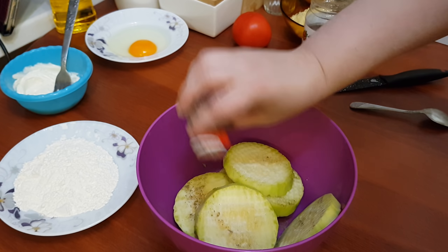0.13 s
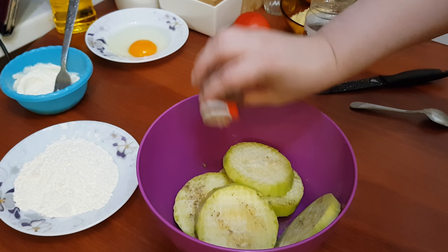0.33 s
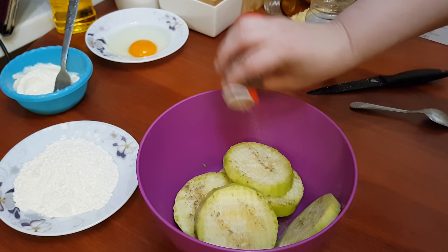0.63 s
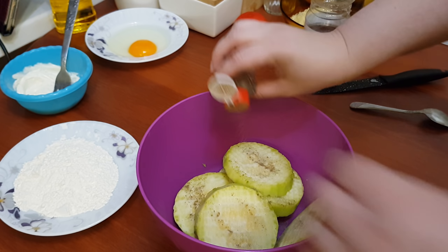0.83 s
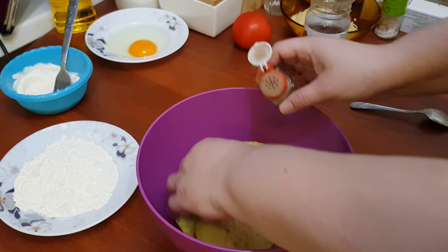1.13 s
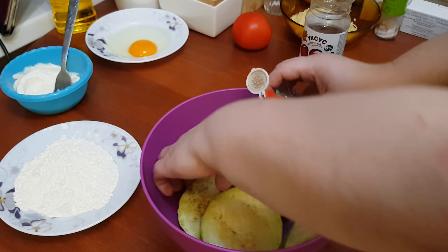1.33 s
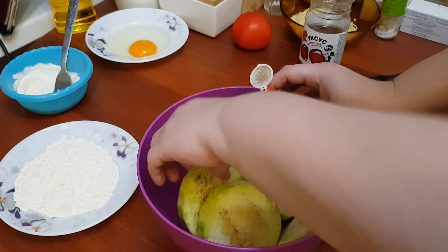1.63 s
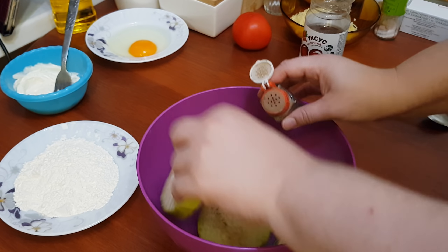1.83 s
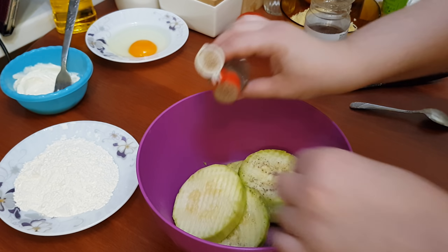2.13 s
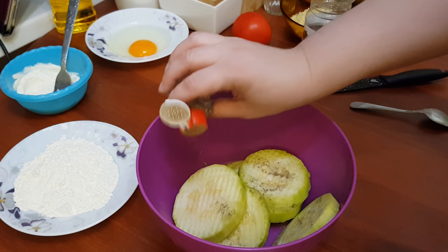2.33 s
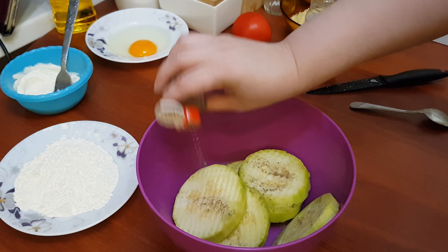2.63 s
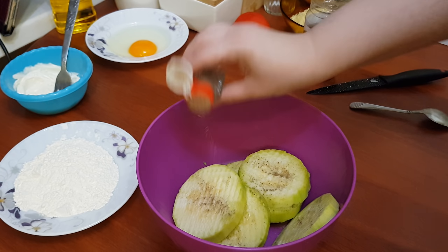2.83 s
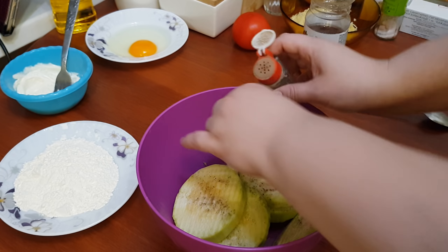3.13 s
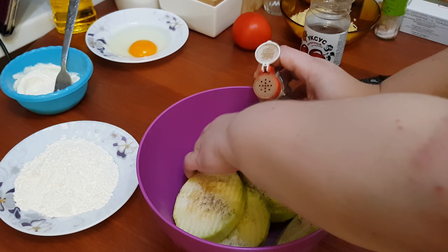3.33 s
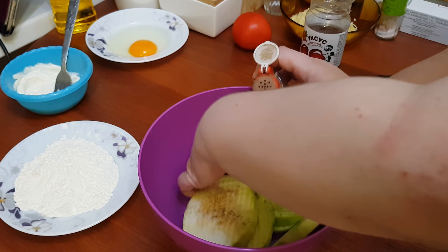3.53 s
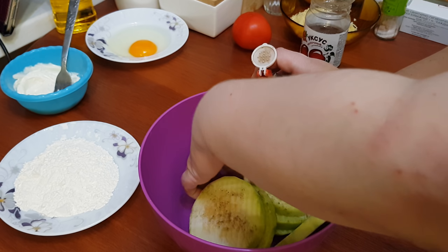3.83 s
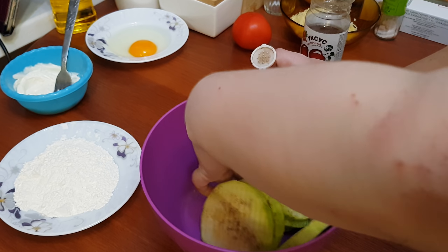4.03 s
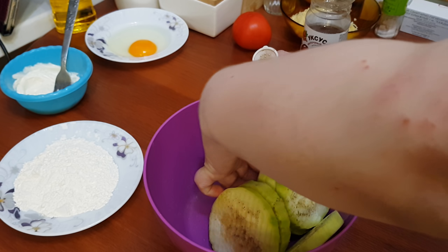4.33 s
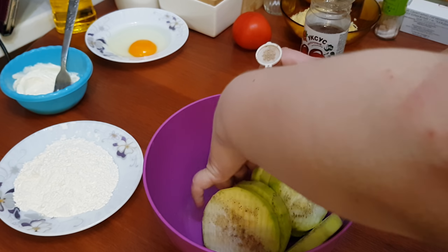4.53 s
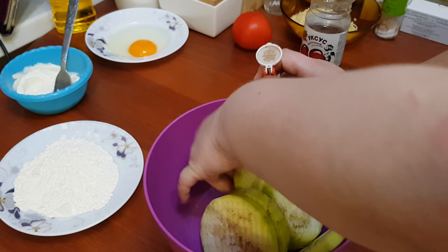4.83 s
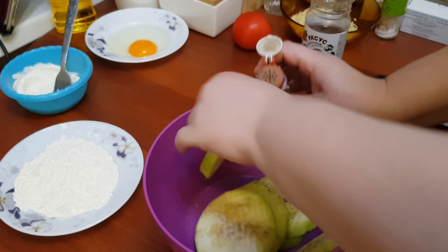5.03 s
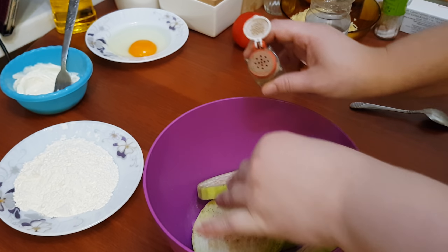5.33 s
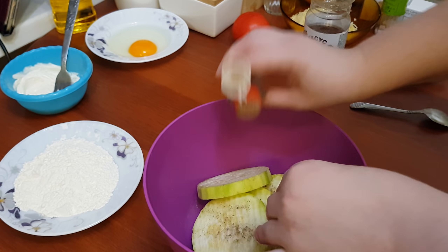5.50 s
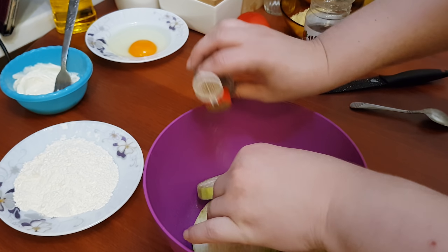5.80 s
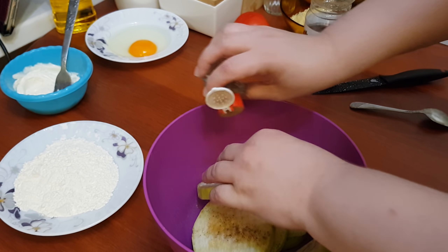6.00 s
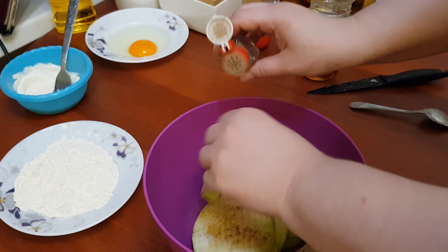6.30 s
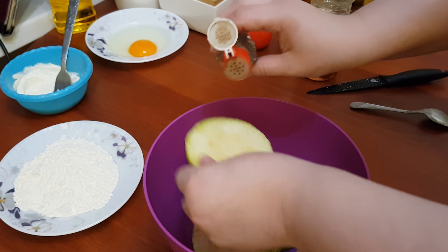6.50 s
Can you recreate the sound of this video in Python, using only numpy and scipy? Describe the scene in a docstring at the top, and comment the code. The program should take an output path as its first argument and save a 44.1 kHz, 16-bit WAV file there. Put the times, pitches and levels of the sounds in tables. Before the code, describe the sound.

Squash slices knock, slide and squeak in a plastic bowl with light irregular thuds and a soft rustle of seasoning.

```python
"""Squash slices turned over in a plastic bowl on a wooden table, close to a stereo microphone.
Slices and fingers knock and slide on the wall and set bowl and table ringing; wet faces squeak
and slap apart, skin and seasoning rustle. Across the small kitchen a wall clock ticks, heard only
through the room. A faint breathy tone comes and goes; the building hums under the microphone hiss."""
import sys
import numpy as np
from scipy import signal
from scipy.fft import rfft, irfft
from scipy.io import wavfile

SR = 44100
rng = np.random.default_rng(int(sys.argv[2]) if len(sys.argv) > 2 else 0)


def transcribe(signal):
    """Save signal, clipped to [-1, 1], as a 16-bit WAV file at the path in sys.argv[1]."""
    frames = np.atleast_2d(signal).T
    limited = np.clip(frames, -1, 1)
    pcm = np.round(limited * 32767).astype(np.int16)
    wavfile.write(sys.argv[1], SR, pcm)


N = 293706

# Knocks on the bowl. Each row: start in seconds, wall level in dB, then table boom, thud, hard edge
# and crack in dB on top of it (knocks() adds an offset to each), left minus right in dB.
KNOCKS = [(0.145, -51.5, -5.5, 2, -29, -26.5, -0.5), (0.498, -35.5, -26, -22, -42, -29.5, -2),
          (0.569, -40.5, -9, -5.5, -34, -46, 1), (0.595, -40.5, -21, -27, -37, -40, -4),
          (0.668, -49, -12, -1.5, -31, -46, 2), (1.126, -16.5, -37, -19.5, -0.5, -19.5, 2.5),
          (1.138, -17.5, -34, -21, -35, -12.5, 1), (1.224, -27, -38, -18, -5.5, -19.5, -1.5),
          (1.271, -28, -37, -23, -1, -14, 2.5), (1.37, -28, -36, -19, -14, -23, 1),
          (1.462, -25, -33.5, -19.5, -17.5, -22.5, -1.5), (1.499, -37.5, -10.5, -28, -19, -6.5, 2),
          (1.671, -27.5, -39, -27, -10.5, -26, 3), (1.691, -29, -36, -19.5, -9, -39, 2),
          (1.71, -31, -38, -12.5, -11.5, -23, 6), (1.823, -17, -24, -20, -29, -28.5, 2),
          (1.963, -31, -26, -18, -38, -49, -3), (1.997, -27, -21, -20, -13, -18.5, 1.5),
          (2.487, -52.5, -12, -1.5, -29, -27, -3), (2.604, -39, -23.5, -14, -31, -41, -1),
          (2.948, -44, -25, -11, -17.5, -32, -3), (3.172, -16.5, -65, -22.5, -1, -6, 3.5),
          (3.191, -18, -32, -27, -21, -21, 0.5), (3.289, -23, -37, -22, -10, -41, 2),
          (3.37, -32, -29, -12, -27, -24, 3), (3.529, -38, -13, -8.5, -23, -11.5, -3),
          (4.228, -40, -43, -29, -24, -17, 2.5), (4.602, -44, -12.5, -22.5, -13.5, -23, 2),
          (4.632, -39.5, -16.5, -12, -21.5, -31, 1), (5.055, -30.5, -11.5, -49, -2, -24.5, -2),
          (5.059, -12, -25, -29.5, -23, -17, 0.5), (5.25, -39.5, -7, -5.5, -34, -23, -0.5),
          (5.604, -49, -13, -10, -38, -34.5, -2), (6.185, -57.5, -5, -24, -22, -1.5, -4.5)]
# Modes of bowl and table. Each row: pitch in Hz, relative level in dB, 60 dB decay time in seconds.
BOWL_MODES = [(50, -7, .1), (91, -3, .07), (127, 7.5, 0.27), (193.6, 1.5, .1), (268.9, -2.5, 0.27),
              (329.5, -2, 0.18), (450, -10, 0.088), (543, 2.5, 0.052), (700, 10, 0.0078),
              (707.6, -4.5, 0.16), (731.5, 0, 0.01), (1003, 7.5, 0.022), (1234, 2, 0.021),
              (1308, 10.5, 0.0077), (1400, 6.5, .003), (1893, 4.5, 0.011), (2214, -4.5, 0.049),
              (2684, 3.5, .003), (3347, -2.5, 0.0032), (4238, -3.5, 0.003), (7041, -6, .0012),
              (11400, -14.5, 0.0015)]
# Strokes of slices and fingers. Each row: middle in seconds, half length in seconds,
# relative slide level in dB, rustle level in dB, squeak pitch in Hz.
STROKES = [(0.143, 0.12, -95, -77.5, 587), (0.52, 0.13, -68, -86, 600), (0.975, 0.1, -75, -59, 1230),
           (1.26, .12, -46, -71.5, 1250), (1.419, 0.057, -47.5, -71, 1270), (1.509, 0.019, -70, -55, 2220),
           (1.603, 0.058, -49.5, -69, 1250), (1.714, 0.032, -49, -63, 2300),
           (1.999, 0.063, -57, -60.5, 1400), (2.264, 0.11, -81, -65.5, 1230),
           (2.508, 0.21, -71.5, -73, 600), (3.091, .12, -70.5, -60, 1270), (3.377, 0.027, -45.5, -79, 1230),
           (3.511, .1, -48.5, -59.5, 2287), (3.77, 0.11, -66.5, -75.5, 1250),
           (3.984, 0.064, -58, -65.5, 1470), (4.173, 0.09, -49, -66.5, 1087),
           (4.39, 0.035, -54.5, -69, 2200), (4.631, 0.018, -54, -90.5, 2810),
           (4.766, 0.05, -45.5, -65.5, 2220), (5, 0.12, -64, -79, 2270), (5.153, 0.077, -54, -63.5, 1490),
           (5.257, 0.012, -49.5, -54, 2830), (5.746, 0.056, -92, -75.5, 1280),
           (6.09, 0.053, -82.5, -76.5, 1240), (6.193, 0.016, -92.5, -61, 2525),
           (6.244, 0.03, -62.5, -67.5, 810), (6.285, 0.015, -81, -67.5, 3000)]
# Slips along the bowl wall. Each row: frequency in Hz, relative spectral density in dB.
SLIDE_SPECTRUM = [(88, -2), (150, -13), (275, -6.5), (485, -4.5), (551, -6), (841, -5.5), (1090, -8),
                  (2180, -11.5), (4540, -22.5), (12000, -87), (15600, -93), (22000, -120)]
# Dry skin and seasoning. Each row: frequency in Hz, relative spectral density in dB.
RUSTLE_SPECTRUM = [(880, -44.5), (1500, -43), (2110, -7), (3440, -12), (4660, -7.5), (7820, -10.5),
                   (11900, -11), (15500, -17)]
# Modes of the clock case. Each row: pitch in Hz, relative level in dB, 60 dB decay time in seconds.
CLOCK_MODES = [(2730, -1.5, 0.003), (3800, 0, 0.0014)]
# The kitchen's reverberation. Each row: frequency in Hz, 60 dB decay time in seconds.
ROOM_T60 = [(100, 0.26), (700, 0.31), (2000, 0.32), (6000, 0.34), (15000, 0.057)]
# Diffuse sound at the microphone. Each row: frequency in Hz, correlation of left and right.
STEREO_LIKENESS = [(60, 0.64), (290, 0.89), (640, .25), (1400, -0.32), (15000, 0)]
# Rise and fall of the breathy tone. Each row: time in seconds, level in dB.
WHISTLE_LEVELS = [(0, -99), (.3, -81), (.7, -88), (2.0, -92.5), (2.9, -78), (3.101, -94.5), (6.66, -97)]
# Building hum and microphone hiss. Each row: frequency in Hz, relative spectral density in dB.
FLOOR_SPECTRUM = [(12, -43), (20, -23), (53, 0), (202, -4), (308, -12), (407, -13.5), (772, -20.5),
                  (993, -15), (1550, -25), (2110, -26.5), (2710, -44), (3580, -22.5), (6080, -36),
                  (12900, -28.5), (15700, -37)]
# Borders in Hz between the mode families: table boom, thud, wall, hard edge, crack.
FAMILY_BORDERS_HZ = [160, 400, 850, 2400]

TRAVEL_S = 0.001684   # from bowl to microphone
SOFT_BELOW_DB, SPREAD_MS_PER_DB = -28, 1.62   # light touches land gradually: the weaker, the longer
LATER_SLIPS_DB = -5.5
SPRAY_DB, SPRAY_T60_S, SPRAY_ABOVE_HZ = -27.5, 0.15, 6000
SQUEAK_DB, SQUEAK_T60_S = -8, .006
CLOCK_START_S, CLOCK_STEP_S, CLOCK_DRIVE_DB = .358, .08, -54
ROOM_SEND_DB, FIRST_ECHO_S = -2, 0.0018
WHISTLE_HZ, WHISTLE_WIDTH_HZ = 2110, 200
FLOOR_DB, CUTOFF_HZ = -62.5, 16200


def knocks():
    """A contact is a main slip and two weaker ones; each strikes every mode with a smooth push."""
    start_s, wall_db, boom_db, thud_db, edge_db, crack_db, balance_db = np.transpose(KNOCKS)
    is_later = np.array([0, 1, 1])
    spread_s = np.maximum(SOFT_BELOW_DB - wall_db, .3) * SPREAD_MS_PER_DB / 1000
    late_s = spread_s[:, None] * rng.random((len(KNOCKS), 3)) * is_later
    landings = np.round((start_s[:, None] + TRAVEL_S + late_s) * SR).astype(int)
    side_gains = from_db(np.outer([.5, -.5], balance_db))
    family_db = [boom_db + 6, thud_db + 6, 0, edge_db + 6, crack_db + 16]
    scatter_db = rng.normal(0, 1.5, (len(KNOCKS), 3, len(BOWL_MODES)))
    bowl = np.zeros((2, N))
    for k, (hz, mode_db, t60) in enumerate(BOWL_MODES):
        push = np.hanning(int(.6 * SR / hz) + 3)   # about half a cycle
        span = landings[..., None] + np.arange(len(push)) - min(len(push) // 2, 40)
        size_db = wall_db - 9 + family_db[np.searchsorted(FAMILY_BORDERS_HZ, hz)] + mode_db
        sizes = from_db(size_db[:, None] + LATER_SLIPS_DB * is_later + scatter_db[:, :, k])
        force = np.zeros((2, N))
        for side, gain in zip(force, side_gains):
            np.add.at(side, span, (gain[:, None] * sizes)[..., None] * push / push.sum())
        polarity = (-1) ** k if t60 > .01 else 1   # brief modes push together
        bowl += polarity * ring(force, hz, t60)
    return bowl


def spray():
    """Wet faces slap apart with a bright spit: high noise leaps up at each knock and dies fast."""
    start_s, wall_db, _, _, _, crack_db, _ = np.transpose(KNOCKS)
    hits = np.zeros(N)
    hits[np.round((start_s + TRAVEL_S) * SR).astype(int)] = from_db(wall_db + crack_db / 2 + SPRAY_DB)
    fade = signal.lfilter([1], [1, -from_db(-60 / (SPRAY_T60_S * SR))], hits + 1e-18)
    highpass = signal.butter(2, SPRAY_ABOVE_HZ, "high", fs=SR, output="sos")
    return fade * signal.sosfilt(highpass, rng.standard_normal((2, N)))


def rubbing():
    """Sliding slips drive the bowl modes and a wet squeak, dead centre; a finer rustle spreads wide."""
    slips = colour(grains(per_s=2500, spread_db=3.4), SLIDE_SPECTRUM)
    bowl = rms_one(sum(from_db(db) * ring(slips, hz, t60) for hz, db, t60 in BOWL_MODES))
    scuff = rms_one(slips + .5 * bowl)
    wet_slips = rms_one(grains(per_s=2200, spread_db=2.3))
    slide, rustle_gain = np.zeros(N), np.zeros(N)
    for middle_s, half_s, slide_db, rustle_db, squeak_hz in STROKES:
        first, last = int((middle_s - 3 * half_s) * SR), int((middle_s + 3 * half_s) * SR)
        span = np.arange(max(first, 0), min(last, N))
        speed = np.exp(-((span / SR - middle_s) / half_s) ** 2)
        squeak = from_db(SQUEAK_DB) * rms_one(ring(wet_slips[span], squeak_hz, SQUEAK_T60_S))
        slide[span] += from_db(slide_db) * speed * (scuff[span] + squeak)
        rustle_gain[span] += from_db(rustle_db) * speed
    rustle = np.array([colour(grains(per_s=9000, spread_db=3.2), RUSTLE_SPECTRUM) for side in range(2)])
    slide *= from_db(0.92 * drift(25) - 5)   # both levels flutter
    rustle_gain *= from_db(1.66 * drift(28.5))
    return slide + rustle_gain * rustle


def clock():
    """Once a second the hand steps on, and a short run of small clicks rings the case."""
    starts_s = np.arange(CLOCK_START_S, N / SR, 1)
    clicks_s = starts_s[:, None] + CLOCK_STEP_S * rng.random((len(starts_s), 14))
    clicks = np.zeros(N)
    clicks[(clicks_s * SR).astype(int)] = from_db(CLOCK_DRIVE_DB) * rng.standard_normal(clicks_s.shape)
    case = sum(from_db(db) * ring(clicks, hz, t60) for hz, db, t60 in CLOCK_MODES)
    return signal.sosfilt(signal.butter(2, 5000, fs=SR, output="sos"), case)


def kitchen(sound):
    """Dense echoes off the near walls reach the microphone after a short gap and die band by band."""
    t = np.arange(SR // 2) / SR
    echoes = diffuse(len(t), lambda hz: from_db(-60 * t / at_hz(ROOM_T60, hz)))
    echoes *= np.clip(t / FIRST_ECHO_S - .5, 0, 1)
    echoes /= np.sqrt(np.mean(np.sum(echoes ** 2, axis=1)))   # unit energy
    return signal.fftconvolve(sound[None], echoes, axes=1)[:, :N]


def whistle():
    """A faint breathy tone comes and goes: noise passed twice through one resonance."""
    t60 = np.log(1000) / (np.pi * WHISTLE_WIDTH_HZ)
    breath = ring(rng.standard_normal((2, N)), WHISTLE_HZ, t60)
    tone = rms_one(ring(breath, WHISTLE_HZ, t60))
    return from_db(np.interp(np.arange(N) / SR, *np.transpose(WHISTLE_LEVELS))) * tone


def hum_and_hiss():
    """The building's low hum wavers below 450 Hz, under smooth microphone hiss."""
    shared_sway = 0.35 * drift(2)

    def band_gain(hz):
        sway_db = 2 * (shared_sway + drift(21)) * (hz < 450)
        return from_db(at_hz(FLOOR_SPECTRUM, hz) + sway_db)

    return from_db(FLOOR_DB) * rms_one(diffuse(N, band_gain))


def ring(force, hz, t60):
    """One mode radiating as a dipole: a steady push is silent, a unit click rings at height 1."""
    radius, angle = from_db(-60 / (t60 * SR)), 2 * np.pi * hz / SR
    return signal.lfilter([.5, 0, -.5], [1, -2 * radius * np.cos(angle), radius ** 2], force + 1e-18)


def grains(per_s, spread_db):
    """Dense random slips of uneven size."""
    sizes = from_db(spread_db * np.minimum(rng.exponential(1, N), 5)) * rng.choice([-1, 1], N)
    return sizes * (rng.random(N) < per_s / SR)


def diffuse(size, gain):
    """Stereo noise from all round the microphone; gain(hz) shapes each half-octave band."""
    edges_hz = 20 * 2 ** np.arange(0, 10, .5)
    field, white = 0, rng.standard_normal((2, 2, size))
    for k, (low, high) in enumerate(zip(edges_hz, edges_hz[1:])):
        bandpass = signal.butter(2, [low, high], "band", fs=SR, output="sos")
        mid, side = signal.sosfilt(bandpass, white[k % 2])
        hz = np.sqrt(low * high)
        alike = np.clip(at_hz(STEREO_LIKENESS, hz), -1, 1)
        field += gain(hz) * (np.sqrt(1 + alike) * mid + np.sqrt(1 - alike) * side * [[1], [-1]])
    return field


def drift(rate_hz):
    """Smooth random wander, rms about 1."""
    step = 40   # samples
    pole = np.exp(-2 * np.pi * rate_hz * step / SR)
    slow = signal.lfilter([1], [1, -2 * pole, pole ** 2], rng.standard_normal(N // step + 2002))[2000:]
    return np.interp(np.arange(N) / step, np.arange(len(slow)), rms_one(slow))


def colour(flat, spectrum):
    """Give a flat signal the spectrum, at rms 1."""
    hz = np.maximum(np.arange(N // 2 + 1) * SR / N, 1)
    return rms_one(irfft(rfft(flat) * from_db(at_hz(spectrum, hz)), N))


def at_hz(table, hz):
    """Read a table of frequencies and values on a log axis."""
    table_hz, values = np.transpose(table)
    return np.interp(np.log(hz), np.log(table_hz), values)


def from_db(db):
    """Decibels to gain."""
    return 10 ** (np.asarray(db) / 20)


def rms_one(x):
    """Scale to rms 1."""
    return x / np.sqrt(np.mean(x ** 2) + 1e-20)


def scene():
    """The bowl is close to the microphone; the far clock arrives only as room sound."""
    near = knocks() + spray() + rubbing()
    room = kitchen(from_db(ROOM_SEND_DB) * near.mean(axis=0) + clock())
    return near + room + whistle() + hum_and_hiss()


def record(dry):
    """A steep low-pass cuts the highest treble."""
    return signal.sosfilt(signal.cheby2(20, 60, CUTOFF_HZ, fs=SR, output="sos"), dry)


dry = scene()
out = record(dry)
transcribe(out)
```